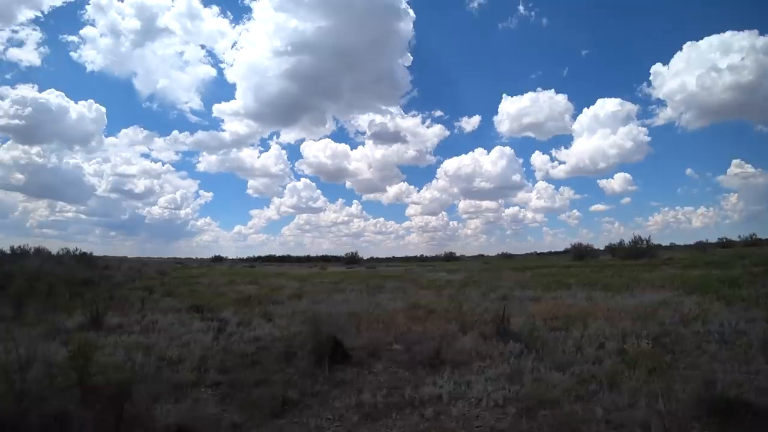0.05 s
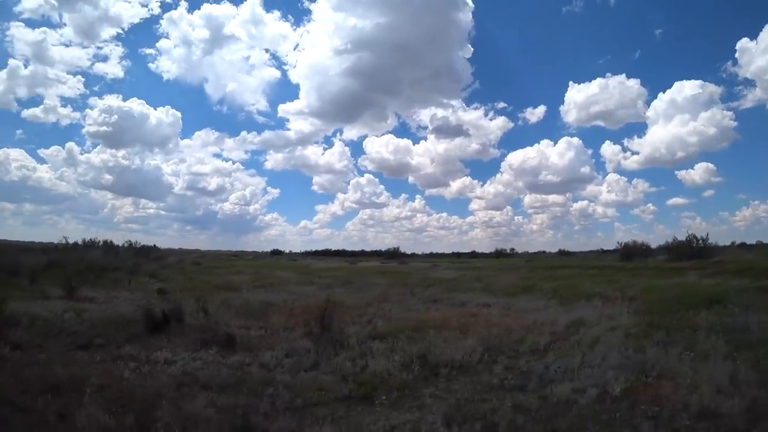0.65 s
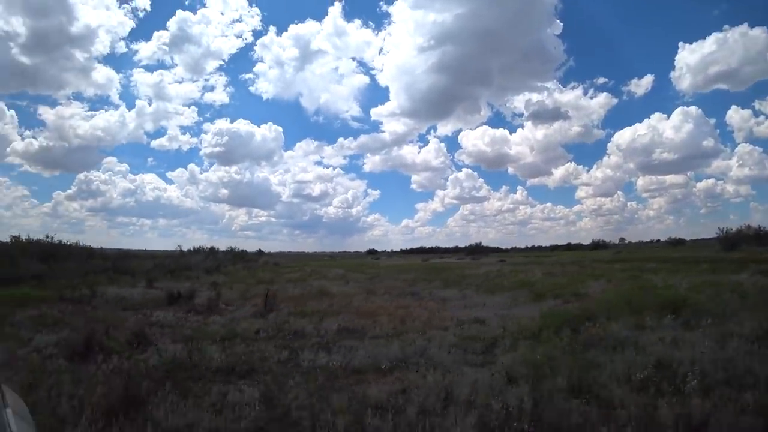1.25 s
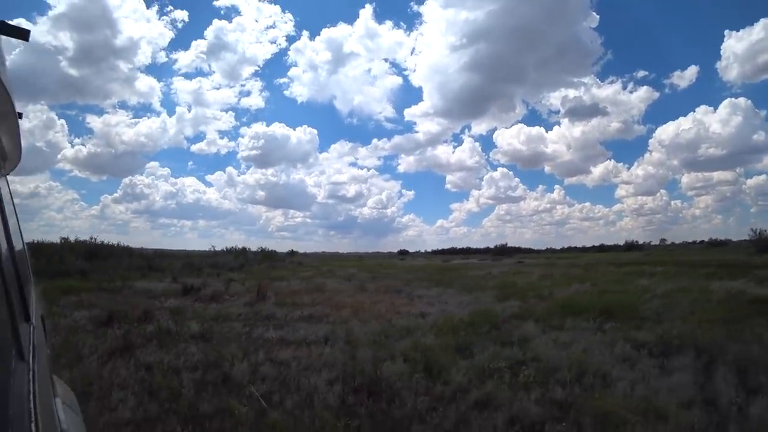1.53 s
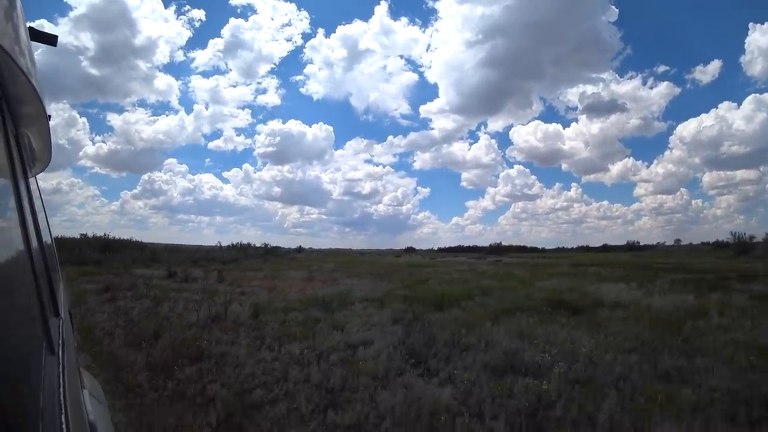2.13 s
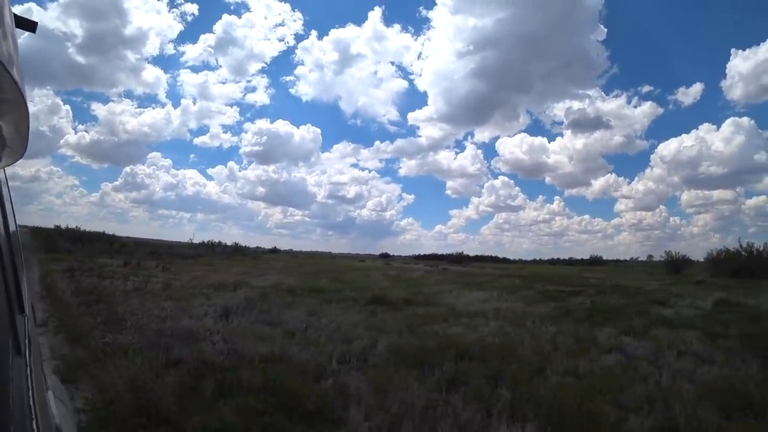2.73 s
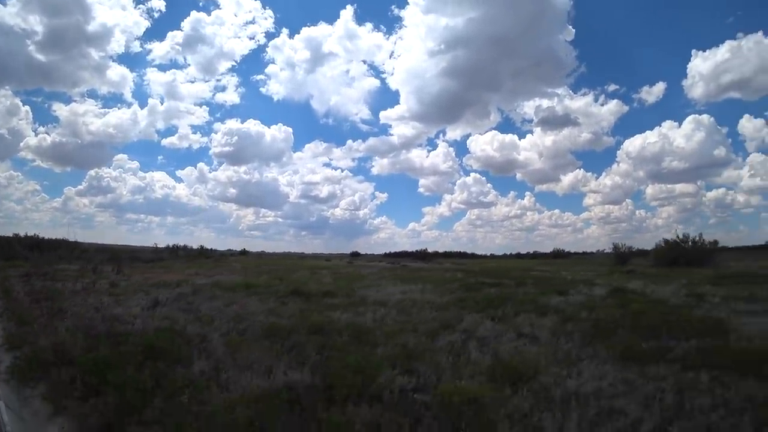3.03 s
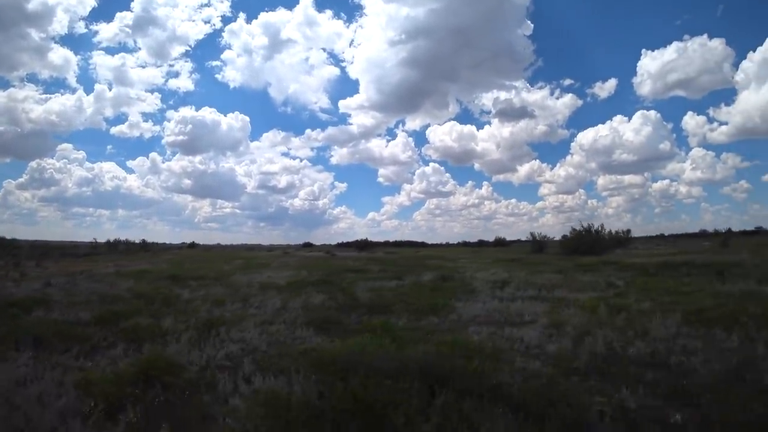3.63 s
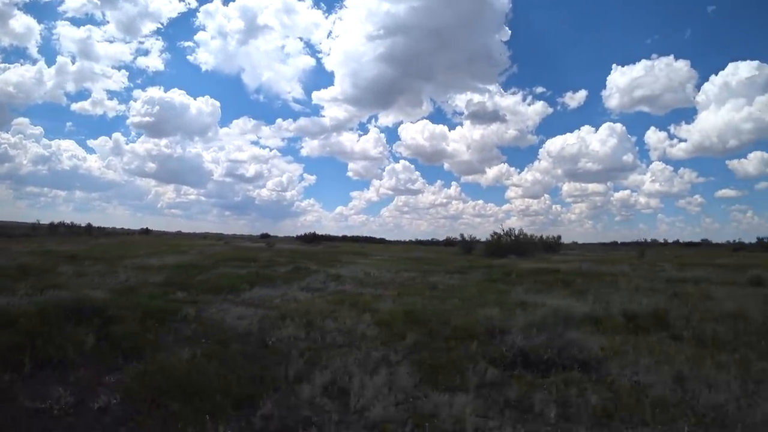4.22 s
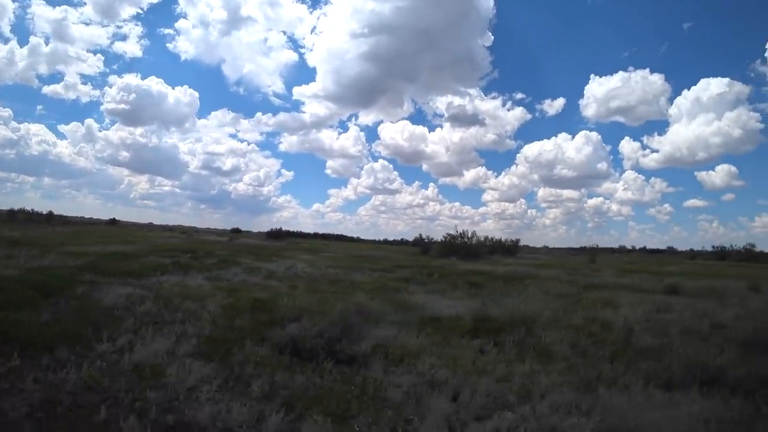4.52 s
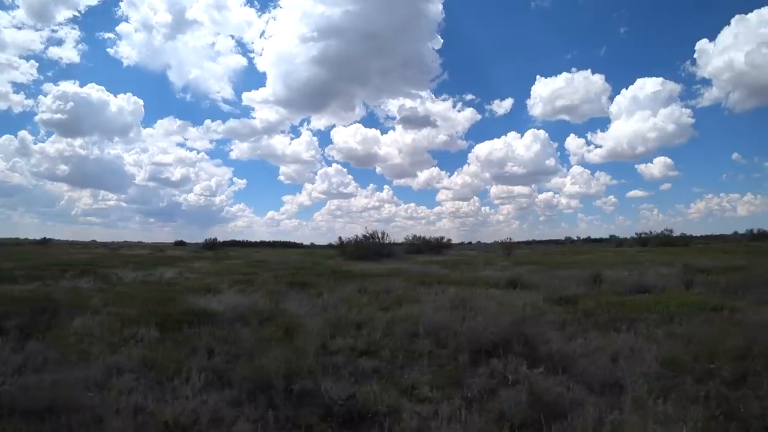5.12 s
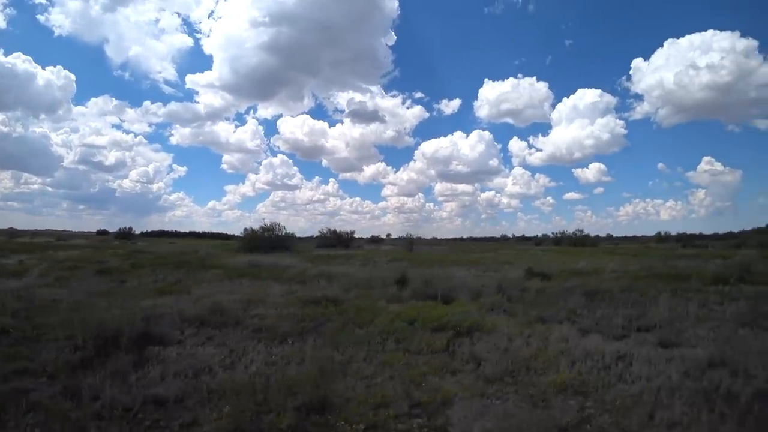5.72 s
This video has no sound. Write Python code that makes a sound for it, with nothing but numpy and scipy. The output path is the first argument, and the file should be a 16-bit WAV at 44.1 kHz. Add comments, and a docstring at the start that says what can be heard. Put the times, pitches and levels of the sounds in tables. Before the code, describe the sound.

An off-road vehicle rumbles over bumpy ground in thumping gusts of wind, its body creaking as dry brush scrapes past.

```python
"""Buffeting wind and a deep rumble, just outside the side window of an off-road vehicle on rough grassland.
The low wind bluster is in opposite phase left and right; the hardest buffets overload the input,
with dull knocking sounds. The chassis rumbles over ruts, tyres crunch, the engine drones and gears whine.
Dry brush hisses and ticks along the side, twigs crack on it, the body creaks and a loose part rattles."""
import sys
import numpy as np
from scipy import signal
from scipy.fft import rfft, irfft, next_fast_len
from scipy.io import wavfile
from scipy.ndimage import uniform_filter1d

SR = 44100
rng = np.random.default_rng(int(sys.argv[2]) if len(sys.argv) > 2 else 0)


def unload_audio(sound):
    """Save the sound as a 16-bit wav file, at the path given as the first command line argument."""
    columns = np.transpose(np.atleast_2d(sound))
    # keep every value between -1 and 1, then stretch to whole-number steps
    steps = np.round(np.clip(columns, -1, 1) * 32767)
    wavfile.write(sys.argv[1], SR, steps.astype(np.int16))


N = 258426
TIME = np.arange(N) / SR
# bright snap of twig tips and of grit on the panel: (frequency [Hz], level [dB])
SNAP_SPECTRUM = [(4000, 0.5), (6500, -8), (7600, 10.5), (8700, -5), (11000, -20)]


def from_db(db):
    """Decibels to gain."""
    return 10 ** (np.asarray(db) / 20)


def rms_one(x):
    """Scale to unit rms."""
    return x / np.sqrt(np.mean(x ** 2) + 1e-20)


def in_time(rows):
    """Each column of an automation curve at every sample."""
    s, *columns = np.transpose(rows)
    return [np.interp(TIME, s, c) for c in columns]


def bell(s, width):
    """A smooth swell of height 1 at time s, down to 1/e at width seconds either side."""
    return np.exp(-np.minimum(((TIME - s) / width) ** 2, 20))


def bursts(times, levels_db, t60):
    """Envelope of sudden blows that rise in under a millisecond and each die away in t60 seconds."""
    blows = np.zeros(N)
    blows[(times * SR).astype(int)] = from_db(levels_db)
    decays = signal.lfilter([1], [1, -from_db(-60 / (t60 * SR))], blows + 1e-18)
    return uniform_filter1d(decays, size=24)


def drift(rate):
    """Smooth random wander of rms 1, changing about rate times a second."""
    hop, settle = 40, 2000
    pole = np.exp(-2 * np.pi * rate * hop / SR)
    noise = rng.standard_normal(N // hop + settle + 2)
    slow = signal.lfilter([1], [1, -2 * pole, pole * pole], noise)[settle:]
    return np.interp(np.arange(N) / hop, np.arange(len(slow)), rms_one(slow))


def white():
    """Two unrelated white noises."""
    return rng.standard_normal((2, N))


def grains(per_s, size_db):
    """Two channels of random contacts, more uneven as size_db grows; rms 1."""
    born = rng.random(N) < per_s / SR
    return rms_one(white() * born * from_db(size_db * np.minimum(rng.exponential(1, N), 4)))


def colour(x, spectrum):
    """Give a signal a spectrum that falls away steeply above its last point; rms 1."""
    hz, db = np.transpose(spectrum)
    size = next_fast_len(N)
    f = np.maximum(np.arange(size // 2 + 1) * SR / size, 1)
    gain = from_db(np.interp(np.log(f), np.log(hz), db)) * np.minimum(hz[-1] / f, 1) ** 3
    return rms_one(irfft(rfft(x, size) * gain, size)[..., :N])


def steady(x, span):
    """Hold the power of a noise even over span seconds."""
    size = max(int(span * SR), 2)
    power = np.mean(np.atleast_2d(x) ** 2, axis=0)
    power = uniform_filter1d(uniform_filter1d(power, size), size)
    return x / np.sqrt(np.maximum(power, 0) + 1e-9)


def ring(clicks, hz, t60):
    """A unit click sets a sine of height 1 ringing."""
    r, w = from_db(-60 / (t60 * SR)), 2 * np.pi * hz / SR
    return signal.lfilter([0, np.sin(w)], [1, -2 * r * np.cos(w), r * r], clicks + 1e-18)


def spread(pair, side_db, right_db):
    """Two signals become mid and side of a stereo image, leaning right by right_db."""
    sides = np.array([[-1], [1]])
    return (pair[0] + sides * from_db(side_db) * pair[1]) * from_db(sides * right_db / 2)


def wind():
    """Low wind bluster, in opposite phase left and right; a hard buffet is a few irregular swings."""
    # airflow at the microphone: (time [s], level [dB])
    airflow = [(0.0, -17), (0.56, -16), (1.3, -14.5), (1.68, -18), (2.4, -17), (2.56, -17.5), (2.88, -16.5),
               (2.96, -13), (3.2, -18), (3.44, -21), (3.68, -21.5), (4.4, -14.5), (4.88, -16.5),
               (4.96, -16), (5.86, -14.5)]
    # dips between gusts: (time [s], level change [dB])
    lulls = [(.125, -5), (.42, -10), (.58, -7), (1.71, -6), (2.51, -22), (2.76, -3), (3.4, -21), (3.75, -7),
             (3.98, -10), (4.06, -11), (4.25, 0), (4.62, -6), (4.84, -9), (5.23, -4), (5.59, -1)]
    # low bluster of the air: (frequency [Hz], level [dB])
    flow_spectrum = [(15, -21), (40, -3), (80, 3), (130, 0.5), (200, 3), (300, -7), (450, -13), (700, -28),
                     (1000, -38.5), (2000, -49)]
    # hard buffets: (time [s], peak level [dB], half-width [s], swing rate [Hz])
    buffets = [(.025, -7.5, .01, 110), (.075, -7.5, 0.014, 166), (.18, -14, .012, 115),
               (0.242, 0, 0.0079, 166), (.266, -11.5, 0.011, 168), (.671, -9, 0.013, 184),
               (1.022, -6.5, 0.01, 176), (1.127, -12, .012, 182), (1.456, -9.5, 0.0082, 155),
               (1.801, -10, .018, 136), (1.891, -12, 0.02, 100), (2.055, -4.5, 0.013, 132),
               (2.101, -4, 0.014, 122), (2.132, -2.5, 0.0094, 139), (2.17, -18, 0.011, 229),
               (2.214, -5, .009, 183), (2.275, -5.5, 0.021, 143), (2.395, -11, 0.017, 131),
               (2.453, -6.5, 0.02, 152), (2.673, -10, .011, 120), (2.71, -9, .009, 147),
               (2.926, -7.5, 0.011, 175), (3.006, -6.5, 0.018, 129), (3.039, -6.5, 0.0084, 200),
               (3.33, -12, 0.035, 205), (3.362, -14, 0.013, 70), (3.479, -3, .01, 140),
               (3.936, -2.5, 0.017, 146), (4.025, -7, 0.014, 137), (4.097, -11, 0.0094, 147),
               (4.186, -1.5, 0.0068, 151), (4.305, -3, .008, 151), (4.336, -18, .009, 116),
               (4.368, -7, 0.0097, 152), (4.477, -0.5, 0.015, 184.6), (4.556, -11.5, 0.013, 156),
               (4.672, -4, 0.0086, 163), (4.731, -10, 0.024, 127), (4.916, -9.5, 0.039, 94),
               (4.96, 0.5, 0.0054, 212), (5.015, -3.5, 0.0051, 238), (5.046, -3.5, .013, 161),
               (5.088, -1, 0.0074, 161), (5.135, -3.5, .008, 138), (5.277, -14, .013, 110),
               (5.317, -2.5, 0.011, 135), (5.344, 1.5, 0.0083, 133.5), (5.388, -0.5, 0.0095, 146),
               (5.462, -11.5, 0.023, 180), (5.499, -13, 0.0082, 194), (5.532, -4.5, 0.012, 178),
               (5.645, -6, 0.0064, 214), (5.724, -12, 0.015, 158), (5.759, -10, .01, 195),
               (5.794, -19, .015, 180)]
    flow_db, = in_time(airflow)
    gusts_db = 2.5 * drift(22) + sum(db * bell(s, width=0.025) for s, db in lulls)
    flow = from_db(flow_db - 3.5 + gusts_db) * steady(colour(white()[0], flow_spectrum), span=0.038)
    flow = flow * from_db([[-.6], [.6]])
    jitter_rad = 0.68 * drift(115)
    for s, db, width, hz in buffets:
        near = np.abs(TIME - s) < .08
        t = TIME[near] - s
        imbalance_db = rng.normal(0, 1.5, (2, 1))  # each buffet is uneven between left and right
        swell = from_db(db + imbalance_db) * np.exp(-(t / width) ** 2)
        flow[:, near] += swell * np.sin(2 * np.pi * (hz * t + rng.random()) + jitter_rad[near])
    return flow * [[1], [-1]]


def wheels():
    """The chassis rumbles and the body booms over ruts while the tread crunches through soil."""
    # roughness of the ride: (time [s], chassis rumble [dB], body boom [dB])
    ride = [(0.0, -16.5, -25.5), (0.56, -25, -35), (0.64, -25, -33), (1.28, -25, -31), (1.6, -18.5, -35),
            (1.68, -21, -28), (1.76, -24, -48), (1.92, -20.5, -30.5), (2.48, -20.5, -30.5),
            (2.56, -20.5, -35), (3.2, -20.5, -33), (3.44, -21, -23), (3.76, -21.5, -36), (4.08, -18, -19),
            (4.48, -17.5, -27.5), (4.8, -20.5, -26.5), (4.96, -16.5, -26.5), (5.86, -20, -21.5)]
    # swells in ruts, dips on smooth patches: (time [s], level change [dB])
    ruts = [(.08, 3), (.25, 2.5), (.36, 6.5), (.5, -4), (.69, 5), (.84, 0.5), (1.87, 3.5), (2.4, 2),
            (2.59, -4.5), (2.73, -11), (3.37, 6.5), (3.48, 2.5), (3.61, 7.5), (3.72, 0), (3.88, 0.5),
            (4.82, -6), (4.95, 0.5), (5.08, 2), (5.2, -5)]
    # tread on the ground: (time [s], level [dB])
    tread = [(0, -44), (1.1, -38.5), (2.1, -37.5), (3.1, -39), (4.2, -41), (5.85, -46)]
    # sub-bass of the chassis: (frequency [Hz], level [dB])
    rumble_spectrum = [(12, -17), (24, 5.5), (45, 3), (70, 0), (110, -16), (170, -20.5), (300, -39.5)]
    # hollow boom of the body: (frequency [Hz], level [dB])
    boom_spectrum = [(60, -16.5), (100, 2), (140, -5), (200, -9.5), (300, -22), (500, -36)]
    # midrange crunch of the tyres: (frequency [Hz], level [dB])
    tyre_spectrum = [(100, -4), (250, 9), (430, 4), (560, 2), (680, 2), (790, 4), (880, -0.5), (980, -6),
                     (1250, -7), (1550, -9), (1800, -15.5), (3000, -21), (8000, -35.5)]
    rumble_db, boom_db = in_time(ride)
    rumble_db = rumble_db + sum(db * bell(s, width=0.038) for s, db in ruts)
    tread_db, = in_time(tread)
    rumble = from_db(rumble_db - 0.5) * steady(colour(white()[0], rumble_spectrum), span=0.06)
    sway = from_db(rumble_db - 7.5) * colour(white(), rumble_spectrum)
    boom = from_db(boom_db - 2.5) * steady(colour(white()[0], boom_spectrum), span=0.13)
    soil = grains(per_s=5000, size_db=2.5)
    crunch = from_db(tread_db + 3 + 0.76 * drift(22.5)) * colour(soil, tyre_spectrum)
    return (rumble + boom) * from_db([[-1.5], [1.5]]) + sway + spread(crunch, side_db=-1.5, right_db=1.5)


def knocks():
    """Dull knocking sounds go with the overloads: a damped ring and a rough crack, dead centre."""
    # knocks: (time [s], peak level [dB])
    knock_cues = [(.232, -25.5), (.239, -19), (3.933, -15.5), (4.304, -22), (4.368, -17.5), (4.473, -18.5),
                  (4.674, -18.5), (4.964, -13), (5.013, -23), (5.091, -20), (5.137, -18.5), (5.322, -19),
                  (5.34, -25), (5.356, -23), (5.383, -16), (5.533, -19.5)]
    # boxy crack on each knock: (frequency [Hz], level [dB])
    crack_spectrum = [(250, -5), (480, 1.5), (900, 3), (1500, -8.5), (2600, -14.5)]
    ring_t60_s = 0.014
    thud = 0
    for start, level_db in knock_cues:
        t = np.maximum(TIME - start, 0)
        hz = 404 * rng.uniform(0.65, 1.26)
        decay = from_db(level_db - 60 * np.minimum(t / ring_t60_s, 2))
        thud = thud + decay * np.sin(2 * np.pi * hz * t)
    s, db = np.transpose(knock_cues)
    crack = bursts(s, db - 9.5, t60=0.027) * steady(colour(white()[0], crack_spectrum), span=0.0028)
    return signal.sosfilt(signal.butter(2, 2600, fs=SR, output="sos"), thud + crack)


def engine():
    """Firings drone unevenly, the drivetrain moans, and a gear mesh whines at its casing's resonance."""
    # engine speed and drone: (time [s], firing rate [Hz], level [dB])
    revs = [(0, 55.5, -56), (.2, 53, -52), (.47, 50.8, -50), (.87, 49.6, -48), (1.05, 50, -42),
            (1.45, 49.7, -41.5), (1.62, 48.3, -42.5), (2.1, 48, -45), (2.5, 47, -46), (3.0, 49.5, -46),
            (3.55, 49.5, -49), (4.1, 51.3, -52), (4.45, 51.8, -56), (4.8, 54, -58), (5.86, 56, -57)]
    # harmonics of the drone: (multiple of the firing rate, level [dB])
    orders = [(1, 4.5), (2, -18), (3, 1), (5, -4.5), (6, -5.5), (9, -4)]
    # drivetrain moan, up during the first slowing: (time [s], level [dB])
    moan_curve = [(0, -68), (.22, -46.5), (.5, -47), (.78, -45), (.98, -64), (2, -68)]
    # gear whine ahead of the resonance: (time [s], level [dB])
    whine_curve = [(0, -51), (.33, -49.5), (.9, -53), (4.0, -54), (5.86, -50)]
    moan_order, mesh_order = 10, 26
    casing_hz, casing_width_hz = 1340, 35
    firing_hz, drone_db = in_time(revs)
    moan_db, = in_time(moan_curve)
    whine_db, = in_time(whine_curve)
    phase = 2 * np.pi * np.cumsum(firing_hz * (1 + 0.00356 * drift(11.7))) / SR
    drone = 0
    for order, db in orders:
        gain = from_db(db + 3.3 * drift(12.7))
        drone = drone + gain * np.sin(order * phase + rng.uniform(0, 2 * np.pi) + 0.5 * drift(19))
    moan = from_db(moan_db + 0.68 * drift(23)) * np.sin(moan_order * phase + 0.13 * drift(15))
    resonance = 1 / np.hypot(1, 2 * (mesh_order * firing_hz - casing_hz) / casing_width_hz)
    whine = from_db(whine_db + 2 * drift(60)) * resonance * np.sin(mesh_order * phase + .5 * drift(70))
    return np.sqrt(2) * (from_db(drone_db) * drone + moan + whine) * from_db([[-1], [1]])


def brush():
    """Countless stalks swish, tick and sizzle past; one bush drags along the panel with a sharp hiss."""
    # thickness of the brush: (time [s], swish [dB], dry sizzle [dB])
    thickness = [(0.0, -46.5, -74), (1.28, -46.5, -67.5), (1.6, -47, -65.5), (1.92, -45.5, -62),
                 (2.56, -47, -61), (3.4, -51, -72), (3.7, -48, -69), (4.64, -50.5, -76), (4.88, -46, -73),
                 (5.2, -51, -70.5), (5.86, -51, -69)]
    # tufts sweeping past: (time [s], swish change [dB])
    tufts = [(1.29, 3), (2.86, 1), (3.04, 3), (3.26, 4.5), (3.92, 2), (4.43, 2.5), (4.93, -1.5),
             (5.58, 1.5)]
    # the dragging bush: (time [s], level [dB])
    bush = [(5.33, -80), (5.45, -60), (5.58, -54.5), (5.68, -61), (5.86, -56)]
    # soft swish of leaves: (frequency [Hz], level [dB])
    swish_spectrum = [(500, 4.5), (1400, 8.5), (2300, 4.5), (3200, 1.5), (5000, -4), (6800, -11),
                      (7600, -11), (9000, -19.5), (15000, -39.5)]
    # airy sizzle of seed heads: (frequency [Hz], level [dB])
    sizzle_spectrum = [(3000, -9), (6000, 12), (7600, 6), (10000, 2.5), (15500, -5)]
    # narrow hiss of the bush: (frequency [Hz], level [dB])
    drag_spectrum = [(3500, -29), (5200, 0.5), (6000, 5), (6800, 2.5), (7700, 8), (8800, -2), (11000, -7),
                     (13000, -31), (16000, -32)]
    stem_pitches_hz, stem_cycles = np.geomspace(2300, 5800, 7), 48
    swish_db, sizzle_db = in_time(thickness)
    drag_db, = in_time(bush)
    tufts_db = sum(db * bell(s, width=0.053) for s, db in tufts)
    clumps_db = 1.73 * drift(35)
    blades = grains(per_s=12000, size_db=2)
    stems = sum(ring(grains(per_s=14, size_db=2), hz, t60=stem_cycles / hz) for hz in stem_pitches_hz)
    seed_heads = colour(grains(per_s=7000, size_db=3), sizzle_spectrum)
    swish = from_db(swish_db + 0.64 + tufts_db + clumps_db) * colour(blades, swish_spectrum)
    ticks = from_db(swish_db - 12.5 + tufts_db) * rms_one(stems)
    sizzle = from_db(sizzle_db + 2.5 + 1.8 * tufts_db + 2.7 * drift(35)) * seed_heads
    grit = from_db(sizzle_db - 3.5) * colour(grains(per_s=60, size_db=3), SNAP_SPECTRUM)
    drag = from_db(drag_db + 1.7 * drift(30)) * colour(white(), drag_spectrum)
    leafy = spread(swish + ticks, side_db=-12.5, right_db=4.5)
    return leafy + spread(sizzle + grit + drag, side_db=-6.5, right_db=0)


def creaks():
    """Each flex of the body rubs a seal: a short, rough squeak, most with a slide in pitch."""
    # squeaks: (time [s], peak level [dB], pitch [Hz], slide [Hz/s])
    flexes = [(.05, -33, 862, 1000), (.115, -37, 830, -3000), (.661, -33.5, 820, 0),
              (.739, -33.5, 810, 1500), (.821, -33.5, 790, -3500), (.911, -34, 815, -4000),
              (1.04, -32.5, 812, -2500), (1.187, -29.5, 820, -4000), (1.252, -34, 825, -4000),
              (1.318, -38, 880, 0), (1.443, -35, 774, -2000), (1.64, -36, 730, 1500), (1.74, -35, 760, 0),
              (1.815, -33, 870, 4000), (1.886, -31.5, 808, -4000), (1.995, -33, 745, 1000),
              (2.058, -33, 777, -3500), (2.1, -37, 870, 0), (2.213, -35, 780, 0), (2.264, -37, 800, -2000),
              (2.486, -30.5, 823, 7000), (2.557, -34, 780, -5500), (2.669, -35, 850, 2000),
              (2.938, -32, 767, -2500), (2.985, -33, 873, 3500), (3.115, -31.5, 820, -2000),
              (3.243, -29.5, 810, 3000), (3.32, -30.5, 840, -5500), (3.413, -35, 863, 4500),
              (3.546, -32.5, 832, -5500), (3.594, -33, 826, -4000), (3.65, -36, 840, -5000),
              (3.709, -35, 800, -5000), (3.764, -33.5, 848, 0), (3.851, -33.5, 854, 6000),
              (3.915, -33, 863, -3000), (4.059, -34.5, 785, -3000), (4.242, -37, 770, -4500),
              (4.367, -36, 1126, -4000), (4.831, -39, 1084, 0)]
    half_width_s, octave_db = .011, -17.5
    squeaks = np.zeros(N)
    wobble_rad = .42 * drift(120)
    grip = from_db(2 * drift(160) - 1.3)
    for s, db, hz, slide in flexes:
        near = np.abs(TIME - s) < .06
        t = TIME[near] - s
        phase = 2 * np.pi * (hz * t + slide / 2 * t ** 2) + wobble_rad[near]
        swell = from_db(db) * np.exp(-(t / half_width_s) ** 2)
        squeaks[near] += swell * (np.sin(phase) + from_db(octave_db) * np.sin(2 * phase))
    return squeaks * grip * from_db([[-.5], [2.5]])


def twigs():
    """A twig cracks on the panel and rings, its thin tip snaps, and dry ones throw splinters."""
    # twig strikes: (time [s], crack [dB], ring pitch [Hz], tip snap [dB], splinters [dB])
    strikes = [(.0648, -42, 3000, -52, -76), (.5921, -41, 3540, -54, -62), (.765, -37.5, 3300, -62, -80),
               (0.868, -42, 2960, -64, -75), (.9996, -40, 3420, -56, -70), (1.279, -37, 3120, -45, -59),
               (1.402, -39.5, 3800, -42, -66), (1.8424, -43, 2900, -50, -66), (1.9255, -40, 3600, -56, -70),
               (2.0047, -41, 3300, -44, -70), (2.0535, -40, 5400, -36, -56), (2.073, -42, 3300, -41, -64),
               (2.169, -38, 3660, -45, -74), (2.2747, -48, 4200, -49, -68), (2.3376, -44, 3250, -54, -68),
               (2.5544, -51, 5500, -45, -46.5), (2.598, -56, 5500, -40, -45), (2.67, -47, 3000, -46, -70),
               (2.828, -32.5, 2000, -48, -66), (3.267, -41.5, 3200, -43.5, -63),
               (3.5693, -49, 3300, -50, -70), (3.674, -41, 2960, -52, -60), (3.8513, -41, 4100, -51, -72),
               (4.064, -40, 2980, -60, -67), (4.319, -41.5, 3530, -62, -80),
               (4.4635, -35.5, 4530, -66, -57), (4.751, -46, 2930, -46, -62),
               (4.949, -37.5, 3200, -54, -68), (5.1703, -47, 3100, -64, -76), (5.242, -37, 2940, -55, -76)]
    # broad woody crack: (frequency [Hz], level [dB])
    crack_spectrum = [(800, -21), (1400, 4), (2000, 11), (3200, 11), (5000, 0), (7000, -0.5), (12000, -89)]
    # fine spray of splinters: (frequency [Hz], level [dB])
    splinter_spectrum = [(5000, -4), (8000, 2), (11000, 4), (15500, -6)]
    ring_t60_s = 0.035
    s, crack_db, ring_hz, tip_db, splinter_db = np.transpose(strikes)
    crack = bursts(s, crack_db + 1, t60=.024) * colour(white(), crack_spectrum)
    t = TIME[:SR // 20]
    for start, db, hz in zip((s * SR).astype(int), crack_db, ring_hz):
        wander_rad = np.cumsum(rng.normal(0, .1, len(t)))
        decay = from_db(db - 1.5 - 60 * t / ring_t60_s)
        crack[0, start:start + len(t)] += decay * np.sin(2 * np.pi * hz * t + wander_rad)  # mid only
    tip = bursts(s, tip_db, t60=0.031) * colour(white(), SNAP_SPECTRUM)
    splinters = bursts(s, splinter_db, t60=0.074) * colour(white(), splinter_spectrum)
    return spread(crack, side_db=-14, right_db=0.5) + spread(tip + splinters, side_db=-6, right_db=-1)


def rattle():
    """Dense uneven contacts ring a loose part at two close resonances."""
    # fits of rattling: (time [s], level [dB], half-width [s])
    fits = [(.2, -51, 0.37), (.8, -52, 0.1), (1.53, -43.5, 0.011), (1.652, -40, 0.014), (1.725, -45, .012),
            (2.932, -39, .015), (3.134, -46, .015), (3.283, -51, .03), (3.74, -39.5, .015),
            (4.15, -51, 0.13)]
    # twin peaks of the loose part: (frequency [Hz], level [dB])
    part_spectrum = [(1000, -19), (1230, -15), (1320, 4), (1420, -4.5), (1560, 3), (1700, -27), (2100, -27)]
    swell = sum(from_db(db) * bell(s, width) for s, db, width in fits)
    chatter = colour(grains(per_s=400, size_db=1), part_spectrum)
    return spread(swell * chatter, side_db=-10, right_db=6)


def scene():
    """Vehicle, vegetation and wind together."""
    return engine() + wheels() + creaks() + rattle() + brush() + twigs() + wind() + knocks()


def record(dry):
    """The input overloads with flat tops, and the highest treble is cut."""
    ceiling, hardness, cutoff_hz, fade_s = .648, 12, 15750, .003
    clipped = dry / (1 + (dry / ceiling) ** hardness) ** (1 / hardness)
    low_pass = signal.ellip(14, .1, 90, cutoff_hz, fs=SR, output="sos")
    fade = np.clip(np.minimum(TIME, TIME[-1] - TIME) / fade_s, 0, 1)
    return signal.sosfilt(low_pass, clipped * fade)


dry = scene()
out = record(dry)
unload_audio(out)
```